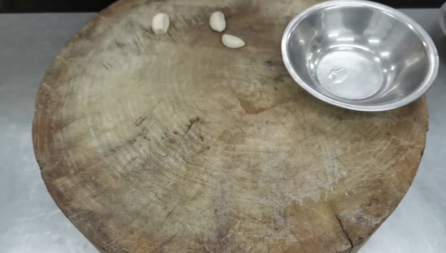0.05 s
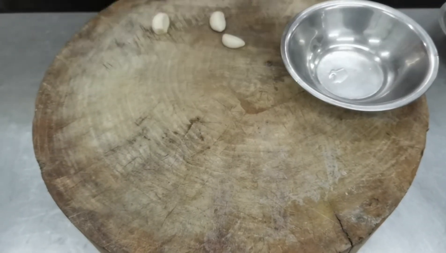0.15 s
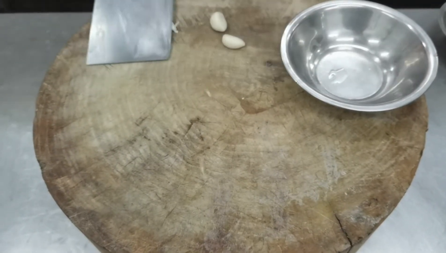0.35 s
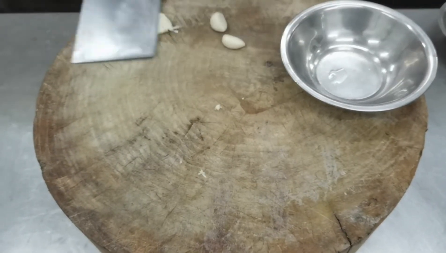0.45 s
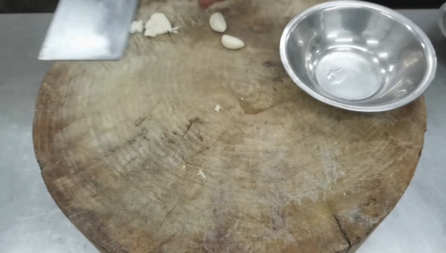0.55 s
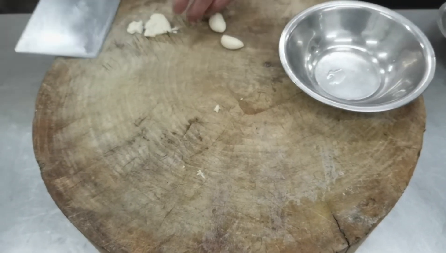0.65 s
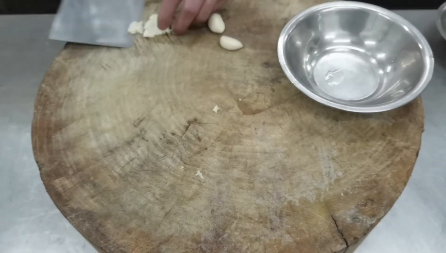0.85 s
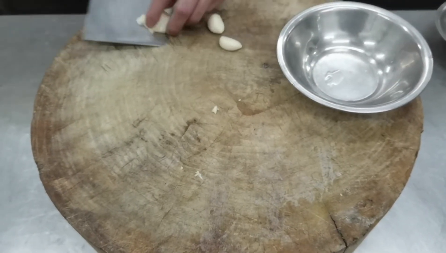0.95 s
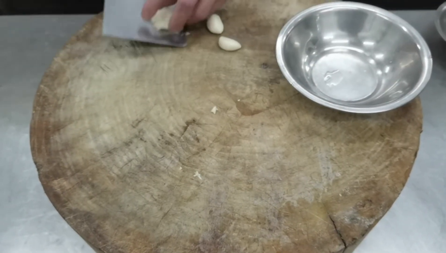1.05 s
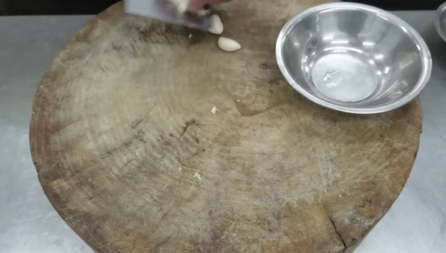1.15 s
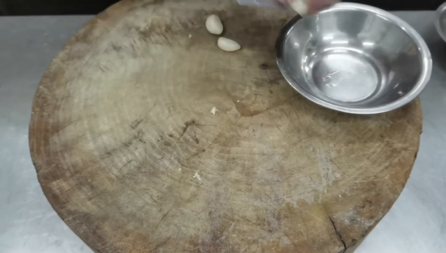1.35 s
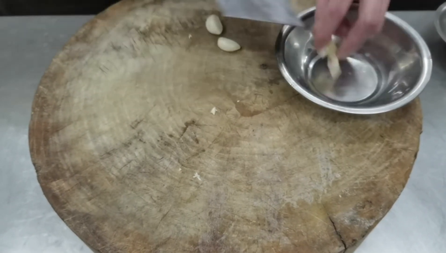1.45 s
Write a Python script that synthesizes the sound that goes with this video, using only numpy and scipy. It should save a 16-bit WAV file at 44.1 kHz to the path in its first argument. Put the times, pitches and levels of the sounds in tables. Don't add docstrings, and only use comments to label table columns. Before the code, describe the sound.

A cleaver slaps a garlic clove flat on a thick wooden block with a ringing crack and boom

```python
import sys
import numpy as np
from scipy import signal
from scipy.fft import rfft, irfft
from scipy.io import wavfile
from scipy.ndimage import uniform_filter1d

SR = 44100
rng = np.random.default_rng(int(sys.argv[2]) if len(sys.argv) > 2 else 0)


def field_ratio(decibels):
    return 10 ** (np.asarray(decibels, dtype=float) / 20)


def master(y):
    cut = np.clip(np.atleast_2d(y).T, -1, 1)
    pcm = np.round(cut * 32767)
    wavfile.write(sys.argv[1], SR, pcm.astype(np.int16))


N = 66150
T = np.arange(N) / SR

# pitch_hz, level_db
FAN_AIR = [(12, -48), (20, 5.5), (68, 0.5), (104, 7.5), (150, -10.5), (234, -7.5), (527, -26), (13500, -47),
           (16000, -39.5)]
# pitch_hz, width_hz, level_db
FAN_HUMS = [(96, 4, -71), (230, 7.3, -67.5), (334, 21, -71.5), (400, 4.3, -70), (853, 83, -72)]
# (time to fall 60 dB, in every table)
ROOM_FADE = [(60, 3.3), (250, 2.8), (700, 0.67), (2000, 0.58), (5000, 0.7), (10000, 0.46), (16000, 0.24)]
# pitch_hz, level_db
ROOM_COLOUR = [(60, -5.5), (300, -5), (600, 0.5), (1250, 1), (2300, 7), (5000, 1.5), (9500, -2),
               (16000, -10)]
# start_s, level_db, pitch_hz, fade_s
STEEL_TOUCHES = [(.790, -52, 10300, .05), (.757, -56, 3050, .06), (.683, -48, 640, .06), (.684, -52, 860, .04),
                 (.683, -52, 520, .05), (1.29, -68, 9900, .3), (1.447, -44, 7810, .035), (1.445, -50, 12400, .05),
                 (1.424, -55, 11600, .1), (1.446, -50, 10200, .04), (1.437, -52, 4650, .12),
                 (1.446, -49, 4600, .05), (1.438, -49, 3820, .03), (1.427, -56, 7900, .08), (1.44, -53, 11200, .06),
                 (1.488, -48, 9890, .12), (1.4865, -47, 8190, .02), (1.492, -47, 8190, .025),
                 (1.493, -48, 2510, .03),
                 (0, -80, 8750, 1.5),
    (1.446, -41, 3895, .13),
]
# start_s, level_db, brightness_db
DROPS = [
    (1.4772, -27.5, -5),
    (1.4812, -57, 29),
    (1.4862, -24.5, 7.5),
    (1.4889, -46, 17.5),
    (1.4907, -28, 4),
]
# pitch_hz, level_db, fade_s
BOWL = [(655, -18, 0.059), (824, -7.5, 0.025), (1900, -14, 0.0076), (2380, -8, 0.005),
        (3000, -14.5, 0.0083), (4410, -24, 0.019), (7880, -11, 0.0054), (10500, -18, 0.0083)]
# pitch_hz, level_db, fade_s
BOWL_LOW = [(501, -13, .3), (1110, -4, .07), ]
# start_s, level_db
DRAG_1 = [(.555, -80), (.585, -51), (.62, -47.5), (.655, -49), (.668, -58), (.7, -63), (.745, -76), ]
DRAG_2 = [(0.755, -72), (0.78, -59.5), (0.795, -50), (0.83, -57.5), (0.87, -56.5), (0.91, -54), (0.99, -62),
          (1.03, -72.5), (1.05, -96)]
BRUSH = [(1.335, -85), (1.36, -69), (1.41, -74), (1.424, -61), (1.44, -55), (1.451, -48), (1.462, -59),
         (1.475, -62), (1.5, -56), ]
SLIDE = [(.84, -100), (.9, -68.5), (.97, -69), (1.03, -63.5), (1.06, -79), (1.11, -110)]
# pitch_hz, level_db
DRAG_1_COLOUR = [(880, -32), (1500, -20), (2740, -7), (5500, -6), (7600, -1), (13100, -3), (15100, -17),
                 (16000, -61)]
DRAG_2_COLOUR = [(880, -82), (1500, -60), (1760, -20), (3770, -18.5), (4080, -8.5), (9950, 1),
                 (14900, -8.5), (16000, -27)]
BRUSH_COLOUR = [(1500, -20), (2600, -4), (4500, 2), (5300, -13), (6400, 1), (8000, 0), (12500, -5),
                (15500, -14), ]
SLIDE_COLOUR = [(1200, -26.5), (1750, -5.5), (2200, -12.5), (2700, -1.5), (3200, -6), (4200, -3.5),
                (8000, -32)]
# pitch_hz, width_hz, level_db
SING = [(1700, 32, -1), (2720, 250, -15), (2960, 130, -0.5), (4060, 80, -12.5), (6220, 130, -9.5),
        (7030, 140, -11), (8150, 150, -2.5), (8860, 110, -8.5), (10360, 140, -8.5), (9900, 110, -2),
        (10700, 150, -12.5), (13100, 130, -2), (14600, 120, -7)]
# pitch_hz, level_db, fade_s
TABLE = [(37.57, -14.5, 1.8), (70.97, -1.5, 1), (99.8, -2, 1.15), (145.6, -16.5, 1.7), (222.7, -11.5, 1.1),
         (270.2, -13.5, 0.99), (312.8, -11.5, 1), (399.7, -14.5, 0.6)]
# start_s, level_db, edge_brightness_db, push_s
SLAPS = [
    (0.2183, 0, -12, .0001),
    (0.2195, -5, -8, .0001),
    (0.2218, -9, 10, .0001),
    (0.2239, -8, 8, .0001),
    (.2258, -7, -4, .0001),
    (.2283, -13, 4, .0001),
    (.2356, -14, -4, .0001),
    (.2388, -13, 0, .0001),
]
# pitch_hz, level_db, fade_s
FACE = [(700, -4, .01), (900, -2, .008), (1620, -2, .02), (2170, 4, .018), (2340, 1, .014), (2810, -2, .01),
        (3310, 3, .018), (3575, 3, .02), (4010, 3, .014), (4400, -2, .012), (5390, -8, .01)]
# pitch_hz, level_db, fade_s
EDGE = [(6150, -8, .01), (7240, 0, .014), (7770, 4, .013), (8540, -4, .01), (9260, 0, .012),
        (9590, 0, .016), (10200, 0, .014), (10900, -4, .01), (11600, -3, .014), (13600, -8, .01)]
# pitch_hz, level_db, fade_s
BLADE_RING = [(1610, -4, .4), (1868, -3, .45), (2190, 0, .45), (2290, -4, .4), (2425, -2, .42),
              (3290, -1, .5), (3580, -2, .4), (3905, -7, .8), (4360, -5, .4), (7230, -3, .4),
              (7770, -4, .35), (9580, -3, .45), (10194, -2, .45), ]

AIR_DB, HUM_SIDE = -45.5, 0.62
ROOM_DB, ROOM_RISE_S, ROOM_LIKENESS = -4, 0.001, 0.21
TICK_RISE_S = .002
GRIT_DB, PATCHY_DB, SING_DB = 2.2, 3.5, -3
THUD_S, THUD_DB, THUD_RISE_S, SHUDDER = .222, -23, 0.0082, 1.075
SCATTER_DB, SPREAD_RAD = 2, 1.4
LAG_S = 0.000095
CRACK_DB, CRACK_FADE_S, CLAP_DB = -4, 0.014, 15
RING_DB, RING_WIDTH_HZ = -34, 70
SLAP_LOW_HZ, SLAP_TOP_HZ = 850, 11150
SLAP_PAN_DB, DRAG_PAN_DB, BOWL_PAN_DB, SWAY_DB = 3, 1, 2, -9
TOP_HZ, CEILING = 15200, .85


def fade(t, t60):
    return np.exp(-np.log(1000) * t / t60)


def level(x, db):
    return x * field_ratio(db) / np.sqrt(np.mean(x ** 2))


def table(points, hz):
    p = np.array(points)
    return np.interp(np.log(np.maximum(hz, 1)), np.log(p[:, 0]), p[:, 1])


def colour(x, points):
    gain = field_ratio(table(points, np.fft.rfftfreq(N, 1 / SR)))
    return irfft(rfft(x) * gain, N)


def band(x, hz, width):
    return signal.lfilter(*signal.iirpeak(hz, hz / width, SR), x)


def walk(rate):
    step = 64
    k = max(int(SR / step / rate), 2)
    w = rng.standard_normal(N // step + 2)
    w = uniform_filter1d(uniform_filter1d(w, k), k)
    return np.interp(np.arange(N) / step, np.arange(len(w)), w / w.std())


def balance(db):
    return field_ratio([[db / 2], [-db / 2]])


def ring(at, modes, push=.0001, bright_db=0, rise=1e-9, turn=0):
    t = T[T > at][:int(SR * max(d for _, _, d in modes))] - at
    y = np.zeros(len(t))
    for (hz, db, t60), phase in zip(modes, turn + np.zeros(len(modes))):
        tilt = bright_db * np.log2(hz / 2000) / 2
        y = y + field_ratio(db + tilt) * np.sin(2 * np.pi * hz * t + phase) * fade(t, t60)
    bump = np.hanning(int(push * SR) + 3)
    y = np.convolve(y * (1 - np.exp(-t / rise)), bump / bump.sum())
    out = np.zeros(N)
    start = np.searchsorted(T, at, "right")
    out[start:start + len(t)] = y[:len(t)]
    return out


def fans():
    mid, side = rng.standard_normal((2, N))
    side = colour(side, [(30, -21.5), (70, -16.5), (300, -6.0), (1500, 5.5), (16000, 3)])
    out = level(colour(np.array([mid + side, mid - side]), FAN_AIR), AIR_DB - 2.5)
    for hz, width, db in FAN_HUMS:
        source = mid + HUM_SIDE * rng.standard_normal((2, N))
        out = out + level(band(source, hz, width), db) * field_ratio(1.5 * walk(5))
    return out


def room(x):
    octave = np.log2(np.fft.rfftfreq(N, 1 / SR) + 1)
    noise = rng.standard_normal((3, N))
    shared, own = np.sqrt(ROOM_LIKENESS) * noise[0], np.sqrt(1 - ROOM_LIKENESS) * noise[1:]
    spectrum = rfft(shared + own)
    echo = 0
    for hz in 40 * 2 ** np.arange(0, 9, .5):
        part = np.maximum(1 - 2 * np.abs(octave - np.log2(hz)), 0)
        t60 = table(ROOM_FADE, hz)
        gain = field_ratio(table(ROOM_COLOUR, hz)) / np.sqrt(t60 * SR / 14)
        echo = echo + irfft(spectrum * part, N) * fade(T, t60) * gain
    echo = echo * (1 - np.exp(-T / ROOM_RISE_S))
    return field_ratio(ROOM_DB) * signal.fftconvolve(echo, x[None])[:, :N]


def bowl():
    ticks, knocks = np.zeros(N), np.zeros(N)
    for at, db, hz, t60 in STEEL_TOUCHES:
        ticks = ticks + ring(at, [(hz, db, t60)], 0, rise=TICK_RISE_S)
    for at, db, bright_db in DROPS:
        knock = ring(at, BOWL, .00005, bright_db) + ring(at, BOWL_LOW, .0004, bright_db)
        knocks = knocks + field_ratio(db) * knock
    no_bass = signal.butter(2, 380, "high", fs=SR, output="sos")
    return ticks - signal.sosfilt(no_bass, knocks) * field_ratio(-1)


def scrape(curve, shade, sing_db):
    c = np.array(curve)
    press = field_ratio(np.interp(T, c[:, 0], c[:, 1], left=-120, right=-120))

    def even(x, db):
        power = np.sum(np.mean(x ** 2, axis=0) * press ** 2)
        return x * field_ratio(db) * np.sqrt(np.sum(press ** 2) / power)

    bursts_db = GRIT_DB * np.minimum(rng.exponential(size=N), 5)
    grit = rng.standard_normal((2, N)) * field_ratio(bursts_db + 1.5 * walk(70))
    grit = grit + .5 * grit[::-1]
    hiss, sing = 0, 0
    for hz in 1200 * 2 ** np.arange(0, 3.8, .25):
        patches = field_ratio(PATCHY_DB * walk(20))
        hiss = hiss + even(patches * band(grit, hz, hz / 9), 0) * np.sqrt(hz)
    for hz, width, db in SING:
        waver = field_ratio(np.clip(4 * walk(16), -9, 9))
        sing = sing + even(waver * band(grit, hz, width), db)
    mix = even(hiss, 0) + even(sing, SING_DB + sing_db)
    mix = colour(mix, [(700, -58.5)] + list(shade))
    return even(mix, 0) * press * balance(DRAG_PAN_DB)


def thud():
    t = np.maximum(T - THUD_S, 0)
    out = ring(THUD_S, TABLE)
    for hz, db, t60 in TABLE:
        rattle = level(band(rng.standard_normal(N), hz, 0.077 * hz), db)
        out = out + SHUDDER * rattle * fade(t, 0.97 * t60)
    return field_ratio(THUD_DB) * out * (1 - np.exp(-t / THUD_RISE_S))


def blade_ring():
    t = T - SLAPS[0][0]
    out = np.zeros(N)
    for hz, db, t60 in BLADE_RING:
        tone = level(band(rng.standard_normal(N), hz, RING_WIDTH_HZ), db)
        out = out + tone * fade(np.maximum(t, 0), t60)
    return field_ratio(RING_DB) * (t > 0) * out


def slap():
    long_ring = blade_ring()
    tones, crack, clap = 0, 0, np.zeros(N)
    pitches = np.array(FACE + EDGE)[:, 0]
    turn = SPREAD_RAD * rng.uniform(-1, 1, len(pitches)) * (pitches > 1200)
    for at, db, edge_db, push in SLAPS:
        burst = (T > at) * fade(np.maximum(T - at, 0), CRACK_FADE_S)
        crack = crack + field_ratio(db + CRACK_DB) * burst * rng.standard_normal((2, N))
        clap[int(at * SR)] = field_ratio(db + CLAP_DB)
        edge = [(hz, g + edge_db, t60) for hz, g, t60 in EDGE]
        blade = [(hz, g + SCATTER_DB * rng.standard_normal(), t60) for hz, g, t60 in FACE + edge]
        left, right = ring(at, blade, push), ring(at + LAG_S, blade, push, turn=turn)
        tones = tones - field_ratio(db - 13) * np.array([left, right])
    limits = signal.butter(3, [SLAP_LOW_HZ, SLAP_TOP_HZ], "band", fs=SR, output="sos")
    near = signal.sosfilt(limits, tones + field_ratio(3.5) * crack + long_ring)
    return near, signal.sosfilt(limits, clap + field_ratio(2.5) * long_ring)


def scene():
    (blade, clap), boom, clink = slap(), thud(), bowl()
    rub = scrape(DRAG_1, DRAG_1_COLOUR, -9.0) + scrape(DRAG_2, DRAG_2_COLOUR, 1.4)
    rub = rub + scrape(BRUSH, BRUSH_COLOUR, 0) + scrape(SLIDE, SLIDE_COLOUR, -0.5)
    sway = field_ratio(SWAY_DB) * band(np.roll(boom, 300), 33, 25)
    sway = sway + field_ratio(-13.5) * band(np.roll(boom, 90), 250, 300)
    near = blade * balance(SLAP_PAN_DB) + boom + sway * np.array([[1], [-1]])
    near = near + clink * balance(BOWL_PAN_DB) + rub
    echo = room(clap + field_ratio(-15.0) * boom + field_ratio(-2.5) * (clink + rub.mean(axis=0)))
    return near + echo * field_ratio([[.8], [-.8]]) + fans()


def band_limit(x):
    return signal.sosfilt(signal.butter(12, 16430, fs=SR, output="sos"), x)


def record(dry):
    rounded = CEILING * np.tanh(dry / CEILING)
    top_cut = signal.ellip(8, .2, 70, TOP_HZ, fs=SR, output="sos")
    mix = 0.9 * signal.sosfilt(top_cut, rounded)
    return band_limit(mix)


dry = scene()
out = record(dry)
master(out)
```